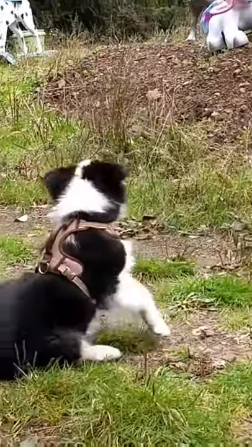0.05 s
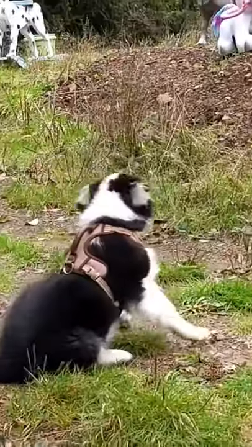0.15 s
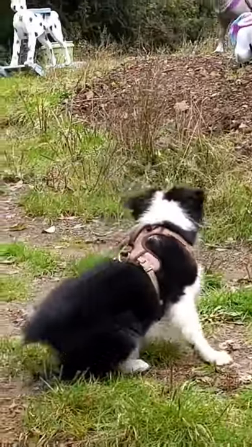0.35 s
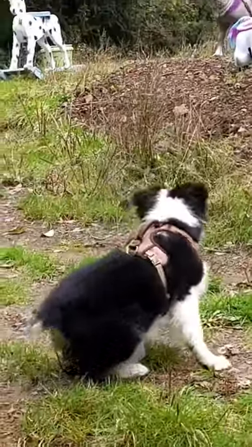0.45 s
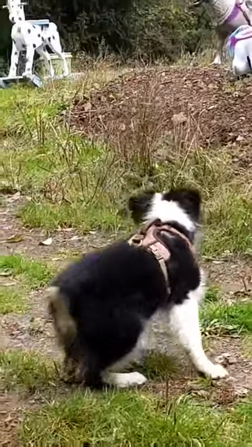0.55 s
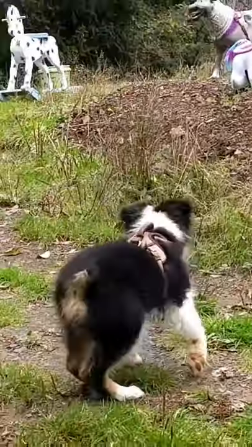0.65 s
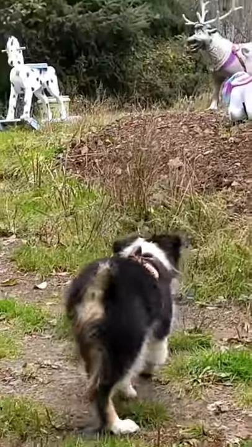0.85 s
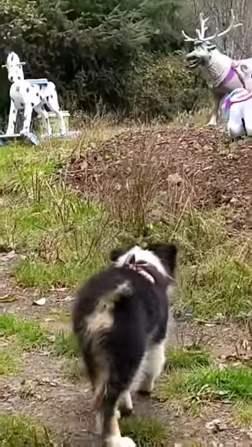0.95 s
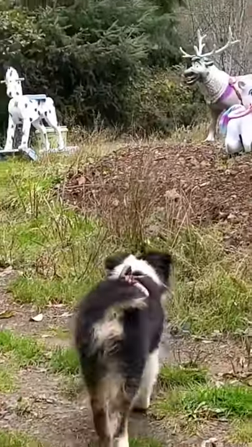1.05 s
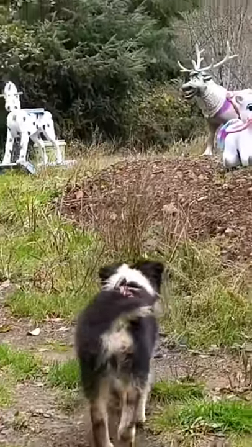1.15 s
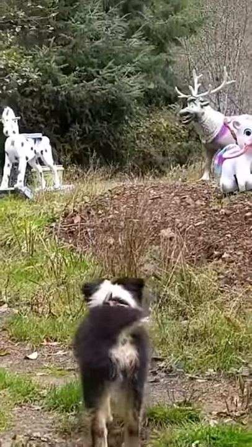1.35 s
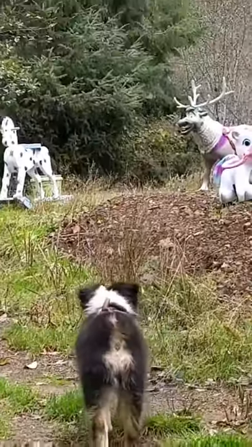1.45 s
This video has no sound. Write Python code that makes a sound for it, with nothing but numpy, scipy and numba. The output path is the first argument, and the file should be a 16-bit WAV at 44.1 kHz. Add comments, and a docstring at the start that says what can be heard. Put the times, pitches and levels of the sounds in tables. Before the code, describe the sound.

A puppy gives one short, high, raspy bark that sinks into a long quiet growl outdoors

```python
"""A puppy a few metres away outdoors gives one short high bark that sinks into a long closed-mouth growl.
The bark is a clear tone of partials with side lines from a slower oscillator, heard as a flutter.
It rasps at both ends: uneven pulses and noise puffs ring the open mouth, and the closed throat in the growl.
Trees echo the dog through coupled delay lines; faint wind and air hiss are noise bands.
Tiny high ticks, perhaps the harness, are short puffs of noise."""
import sys
import numpy as np
from scipy import signal
from scipy.io import wavfile
from scipy.ndimage import uniform_filter1d
from numba import njit

SR = 44100
rng = np.random.default_rng(int(sys.argv[2]) if len(sys.argv) > 2 else 0)


def int16_out(signal):
    """Quantize to a 16-bit WAV file."""
    q = np.round(np.clip(np.atleast_2d(signal).T, -1, 1) * 32767)
    wavfile.write(sys.argv[1], SR, q.astype(np.int16))


def field_ratio(decibels):
    """Amplitude ratio for a level in dB (20 dB per decade); scalars and array-likes work."""
    return 10 ** (np.asarray(decibels, dtype=float) / 20)


N = 66150

# Clear tone of the bark, rms levels: time_s, pitch_hz, partial_1_db, partial_2_db
BARK_TONE = [(0.228, 570.8, -28, -31), (0.244, 637, -25.5, -15.5), (0.258, 614.2, -17.5, -24.5),
             (0.272, 628.8, -14.5, -15.5), (0.296, 644, -23, -12.5), (0.328, 629.5, -17.5, -17),
             (0.346, 611.5, -20, -28.5), (0.362, 590.5, -28.5, -30.5)]
# Open-mouth noise, rms levels: time_s, palate_db, breath_above_2_khz_db, breath_above_4_khz_db, chest_db
RASP_LEVELS = [(0.19, -74, -89.5, -92.5, -66.5), (0.202, -49, -79, -81.5, -41),
               (0.23, -34, -62.5, -67.5, -28.5), (0.252, -20, -46.5, -57.5, -29.5),
               (0.266, -32.5, -42.5, -53.5, -44), (0.308, -34, -50, -60, -49.5),
               (0.33, -40.5, -60.5, -64, -45), (0.358, -35.5, -54.5, -61, -34.5),
               (0.38, -43.5, -64, -68, -32.5), (0.404, -60.5, -72, -74.5, -49),
               (0.45, -65.5, -71, -76.5, -60.5)]
# Slow vocal pulses: time_s, rate_hz, growl_rms_db, roughness (0-1), strong_weak_share (0-1)
VOCAL_PULSES = [(.19, 200.5, -69.5, .5, .1), (.225, 205.3, -40.5, 0.63, .1), (.28, 210.2, -53, 0.72, 0.2),
                (.345, 280, -51.5, .4, 0.3), (.375, 225.2, -34, .38, 0.2), (.41, 189.6, -39.5, .45, 0.2),
                (.5, 170.7, -40, .65, .25), (.6, 135.4, -45.5, 0.38, 0.3), (.7, 125.6, -50, 0.24, 0),
                (.8, 135.3, -47, 0.4, .1), (.86, 170.7, -41, 0.5, .2), (.89, 150, -44, .2, 0),
                (.94, 189.5, -39.5, 0.65, .2), (.99, 170.8, -44, .8, .3), (1.02, 183.6, -39.5, .6, .3),
                (1.045, 150, -42.5, 0.4, 0.2), (1.09, 180.5, -38.5, 0.2, 0.5),
                (1.22, 181, -38.5, 0.06, 0.5), (1.255, 159.6, -44, 0.4, .2), (1.35, 133.2, -48.5, 0.39, .1),
                (1.5, 131.3, -47.5, 0.21, 0)]


def table(rows, col):
    """Linear interpolation of one table column along the time axis."""
    points = np.array(rows, float)
    return np.interp(np.arange(N) / SR, points[:, 0], points[:, col])


def fade(rows, col, rise_s=0.018, fall_s=0.026):
    """Exponential onset and decay: outside the table the gain changes 40 dB per rise_s or fall_s."""
    t = np.arange(N) / SR
    early = np.maximum(rows[0][0] - t, 0) / rise_s
    late = np.maximum(t - rows[-1][0], 0) / fall_s
    return field_ratio(np.maximum(table(rows, col) - 40 * (early + late), -200))


def unit(x):
    """Normalisation of the mean power: rms 1."""
    return x / np.sqrt(np.mean(x ** 2))


def walk(rate_hz):
    """Low-passed random fluctuation: levels held for 1 / rate_hz and slewed twice."""
    hold = int(SR / rate_hz)
    steps = np.repeat(rng.standard_normal(N // hold + 1), hold)
    return 1.6 * uniform_filter1d(uniform_filter1d(steps, hold), hold)[:N]


@njit
def svf(x, centre_hz, width_hz):
    """Second-order resonance: a state-variable band-pass with a moving centre, gain 1 there."""
    y, band, low = np.empty(len(x)), 0., 0.
    for i in range(len(x)):
        g, damping = np.tan(np.pi * centre_hz[i] / SR), width_hz / centre_hz[i]
        v = (band + g * (x[i] - low)) / (1 + g * (g + damping))
        band, low, y[i] = 2 * v - band, low + 2 * g * v, damping * v
    return y


def steep(x, hz, width_hz):
    """Cascaded resonance: two equal band-passes give steeper skirts; rms 1."""
    centre = hz * np.ones(N)
    return unit(svf(svf(x, centre, float(width_hz)), centre, float(width_hz)))


def tract(x, peaks, shift=1, patchy_db=0, size=3000):
    """Source-filter principle: parallel resonances, each flickering alone, evened to rms 1 over size samples."""
    y = 0
    for k, (hz, width_hz, db) in enumerate(peaks):
        gain = (-1) ** k * field_ratio(db + patchy_db * walk(38))
        y = y + gain * steep(x, hz * shift, width_hz)
    return y / np.sqrt(uniform_filter1d(y ** 2, size=size))


def wind():
    """Broadband turbulence: quarter-octave noise bands; the low ones swell with the gust and flicker more."""
    # Wind and air hiss, relative spectral density: freq_hz, density_db (per Hz)
    spectrum = [(20, -8), (70, -1.5), (160, -13), (334, -30), (500, -24.5), (1000, -38.5), (1600, -31.5),
                (3200, -41), (4700, -42), (5700, -51.5), (7000, -46.5), (8100, -52.5), (11000, -42),
                (12600, -52), (15000, -51)]
    # Slow swell of the low bands: time_s, gain_db
    gust = [(0.2, -3), (.6, 1.5), (1.5, 4)]
    freq_hz, density_db = np.array(spectrum, float).T
    out = 0
    for hz in 22 * 2 ** (np.arange(39) / 4):
        # band power grows with bandwidth, which is proportional to hz
        db = np.interp(np.log(hz), np.log(freq_hz), density_db) + 10 * np.log10(hz)
        if hz < 130:
            db = db + table(gust, 1) + 1.5 * walk(8)
        else:
            db = db + 0.8 * walk(8)
        out = out + field_ratio(db) * steep(rng.standard_normal(N), hz, hz / 2.7)
    return field_ratio(-59) * unit(out)  # rms level in dB


@njit
def pulse(rate_hz, rough, half, late, big):
    """Relaxation oscillator: a click per cycle; roughness scatters period and size, alternate clicks are weaker."""
    out, phase, k = np.zeros(len(rate_hz) + 1), 0., 0
    for i in range(len(rate_hz)):
        step = rate_hz[i] * np.exp(rough[i] * late[k]) / SR
        phase += step
        if phase >= 1:
            phase, k = phase - 1, k + 1
            size = np.exp(rough[i] * big[k]) * (1 + half[i] * (2 * (k % 2) - 1))
            # share the click between two samples to place it between them
            out[i] += size * phase / step
            out[i + 1] += size * (1 - phase / step)
    return out[:-1]


def vocal_source():
    """Glottal excitation: uneven clicks, and noise puffs amplitude-modulated by those clicks."""
    late, big = np.clip(rng.standard_normal((N // 50, 2)).T, -1.6, 1.2)
    rough = table(VOCAL_PULSES, 3)
    clicks = unit(pulse(table(VOCAL_PULSES, 1), rough, table(VOCAL_PULSES, 4), 0.35 * late, 0.85 * big))
    decay = np.exp(-1 / (SR * 0.0032))  # each puff decays with a time constant of 3.2 ms
    flow = 0.97 * np.mean(clicks) + signal.lfilter([1], [1, -decay], clicks) / 150
    puffs = unit(flow * rng.standard_normal(N))
    return clicks, puffs


def rasp(clicks, puffs):
    """Formant resonance: pulses and puffs ring mouth, palate and chest; the jaw moves mouth and chest."""
    # Jaw: time_s, frequency_factor, mouth_rms_db
    jaw = [(.192, 0.7, -64.5), (.207, 1.1, -32.5), (.225, 0.95, -30), (.24, 1.056, -17.5),
           (.255, 1.02, -20), (.27, 1.0, -27), (.335, 1.2, -35), (.355, 1.0, -22.5), (.37, 0.95, -26),
           (.385, .84, -41), (.42, .9, -60.5)]
    # Mouth resonances before the jaw's factor: freq_hz, width_hz (of each pass), relative_db
    mouth = [(727, 280, -9.5), (1123, 220, -1)]
    # Palate resonances: freq_hz, width_hz (of each pass), relative_db
    palate = [(1517, 280, 1.5), (1675, 310, 1), (1810, 340, -9)]
    # Chest resonances before the jaw's factor squared: freq_hz, width_hz (of each pass), relative_db
    chest = [(384, 190, -5), (502, 130, -0.5)]
    torn = clicks + 1.8 * puffs
    factor = table(jaw, 1)
    mouth_ring = fade(jaw, 2, fall_s=0.085) * tract(torn, mouth, factor, size=1100)
    palate_ring = fade(RASP_LEVELS, 1, fall_s=0.086) * tract(torn, palate)
    chest_ring = fade(RASP_LEVELS, 4) * tract(torn, chest, factor ** 2, size=1100)
    return mouth_ring + palate_ring + chest_ring


def breath(puffs):
    """Turbulent noise through resonances: steady and puffed air; the top ones follow the bark's pitch."""
    # Resonances above 2 kHz: freq_hz, width_hz (of each pass), relative_db
    middle = [(2476, 500, 4), (3210, 600, 1), (3517, 500, 0)]
    # Resonances above 4 kHz, for a pitch of 635 Hz: freq_hz, width_hz (of each pass), relative_db
    top = [(4640, 900, -2.5), (5800, 1000, -4), (7080, 850, 3.5), (8940, 2200, 1.5), (11200, 2700, -1.5),
           (14600, 3500, -8)]
    air = rng.standard_normal(N) + 1.1 * puffs
    middle_hiss = fade(RASP_LEVELS, 2, fall_s=0.15) * tract(air, middle, patchy_db=3.0)
    top_hiss = tract(air, top, table(BARK_TONE, 1) / 635, patchy_db=2.5)
    return middle_hiss + fade(RASP_LEVELS, 3, fall_s=0.08) * top_hiss


def growl(clicks, puffs):
    """Closed-tract resonance: the pulses ring the throat and upper resonances; roughness adds puffs in the throat."""
    # Throat resonances: freq_hz, width_hz (of each pass), relative_db
    throat = [(150, 120, -1), (252.7, 110, -7), (372, 76.5, -2.5), (607.5, 110, -11.5)]
    # Upper resonances, the nose: freq_hz, width_hz (of each pass), relative_db
    nose = [(827, 470, 4), (1016, 340, 5.5), (1755, 160, -11), (3340, 70, -19.5), (4500, 640, -18.5)]
    # Level of the upper resonances: time_s, rms_db
    nose_level = [(0.5, -62), (0.654, -78.5), (0.81, -71.5), (0.842, -64), (0.892, -73.5), (0.916, -61.5),
                  (1.02, -63.5), (1.178, -61), (1.36, -77.5), (1.5, -75)]
    rough = table(VOCAL_PULSES, 3)
    throat_ring = tract(clicks + (0.06 + 0.6 * rough) * puffs, throat, size=2000)
    nose_ring = tract(clicks + 1.8 * puffs, nose)
    return fade(VOCAL_PULSES, 2) * throat_ring + fade(nose_level, 1, rise_s=0.12) * nose_ring


def clear_voice():
    """Additive harmonics with modulation side lines: partials on the bark's pitch and a slower oscillator."""
    # Upper partials: partial_number, level_db (under partial 2)
    upper = [(3, -29.5), (5, -47)]
    # Flutter line under partial 2, which surges twice: time_s, rms_db
    flutter = [(.262, -36.5), (.275, -29), (.287, -13), (.301, -28.5), (.312, -12), (.322, -35),
               (.335, -29.5)]
    flutter_hz, side_db = 116.85, -21  # mean rate; upper side line relative to partial 1
    phase = 2 * np.pi * np.cumsum(table(BARK_TONE, 1) * (1 + 0.0025 * walk(120))) / SR
    slow = 2 * np.pi * np.cumsum(flutter_hz * (1 + 0.058 * walk(60))) / SR
    side_lines = field_ratio(side_db) * (np.sin(phase + slow) + 0.26 * np.sin(phase - slow))
    first = fade(BARK_TONE, 2, fall_s=0.034) * (np.sin(phase) + side_lines)
    harmonics = np.sin(2 * phase + 1)
    for k, db in upper:
        harmonics = harmonics + field_ratio(db + 2 * walk(98)) * np.sin(k * phase)
    second = fade(BARK_TONE, 3, fall_s=0.0043) * harmonics
    under_second = fade(flutter, 1) * np.sin(2 * phase - slow)
    return np.sqrt(2) * (first + second + under_second)  # sine rms to peak


@njit
def trees(x, lags, gain, damp):
    """Diffuse reverberation: eight delay lines that feed each other, duller on every round."""
    line, soft, out = np.zeros((8, 8192)), np.zeros(8), np.zeros(len(x))
    for i in range(len(x)):
        total = 0.
        for k in range(8):
            soft[k] += (1 - damp) * (gain[k] * line[k, (i - lags[k]) & 8191] - soft[k])
            total += soft[k] * (1 - 2 * (k & 1))
        out[i] = total
        total = soft.sum()
        for k in range(8):
            line[k, i & 8191] = x[i] + soft[k] - total / 4
    return out


def tree_echo(dog):
    """Directivity: the dog faces the trees, so they get more of partials 1 and 3, less of 2, more treble."""
    t60_s, damp, echo_db = 0.66, 0.36, -36.5  # t60 is that of the lines before damping
    ones = np.ones(N)
    ahead = dog + field_ratio(8.5) * svf(dog, 1900 * ones, 350.) + field_ratio(7.0) * svf(dog, 635 * ones, 230.)
    ahead = ahead - 0.5 * svf(dog, 1275 * ones, 150.) + field_ratio(13) * svf(dog, 4500 * ones, 1400.)
    lags = rng.integers(700, 4500, size=8)  # samples
    gain = field_ratio(-60 * lags / SR / t60_s)
    return field_ratio(echo_db) * trees(ahead + 1e-18, lags, gain, damp)  # the offset avoids denormal numbers


def ticks():
    """Transient noise: Gaussian envelopes on a high noise band, perhaps the harness."""
    # Ticks: time_s, peak_gain_db, length_s (half-width at 1/e of the peak)
    tick_rows = [(1.053, -86, .003), (1.174, -81.5, 0.011)]
    t = np.arange(N) / SR
    shape = sum(field_ratio(db) * np.exp(-((t - s) / length) ** 2) for s, db, length in tick_rows)
    return shape * steep(rng.standard_normal(N), 14200, 2500)


def scene():
    """Linear superposition of the dog, its echo, the wind and the ticks in one channel."""
    clicks, puffs = vocal_source()
    dog = clear_voice() + rasp(clicks, puffs) + breath(puffs) + growl(clicks, puffs)
    return (wind() + dog + tree_echo(dog) + ticks())[None]


def top_cut(x):
    """Nothing passes above the cut-off."""
    return signal.sosfilt(signal.butter(12, 15780, fs=SR, output="sos"), x)


def record(dry):
    """Single-point pickup: the superposed pressure is the finished mix."""
    return top_cut(dry)


dry = scene()
out = record(dry)
int16_out(out)
```